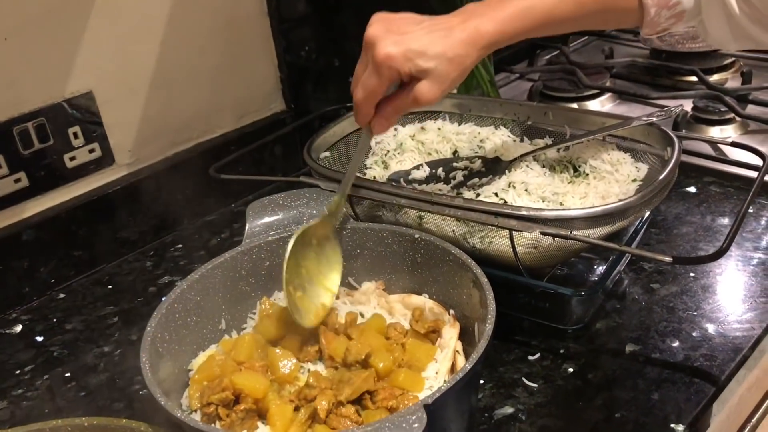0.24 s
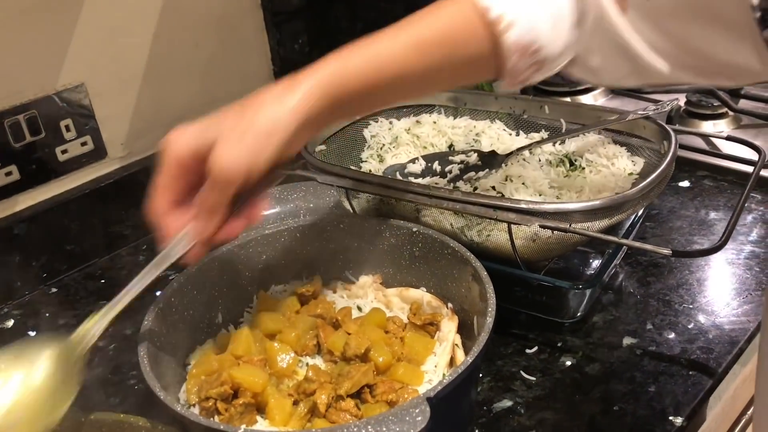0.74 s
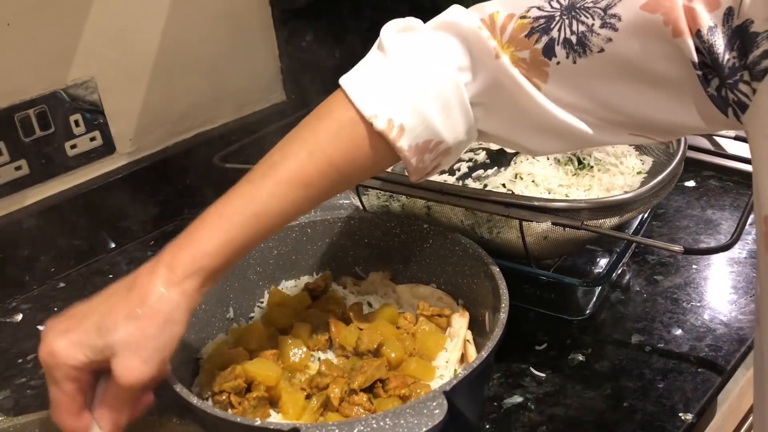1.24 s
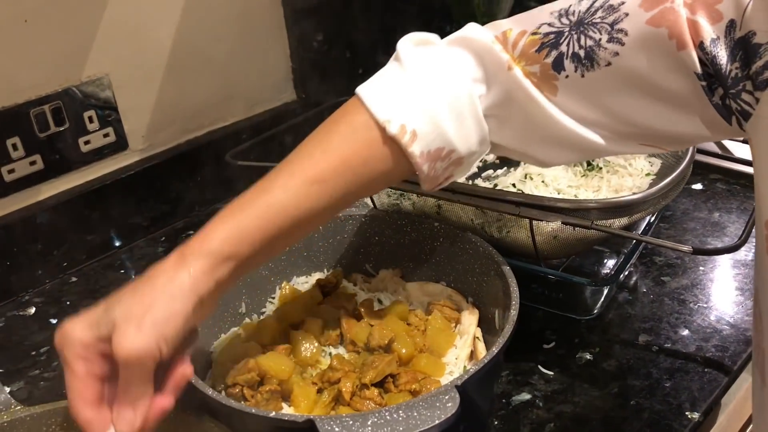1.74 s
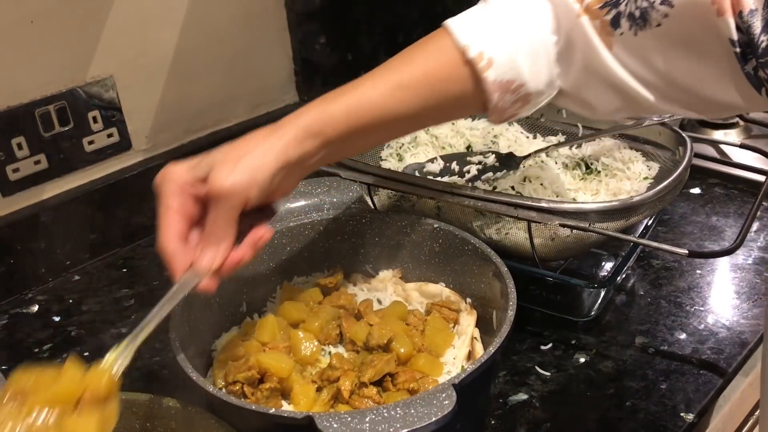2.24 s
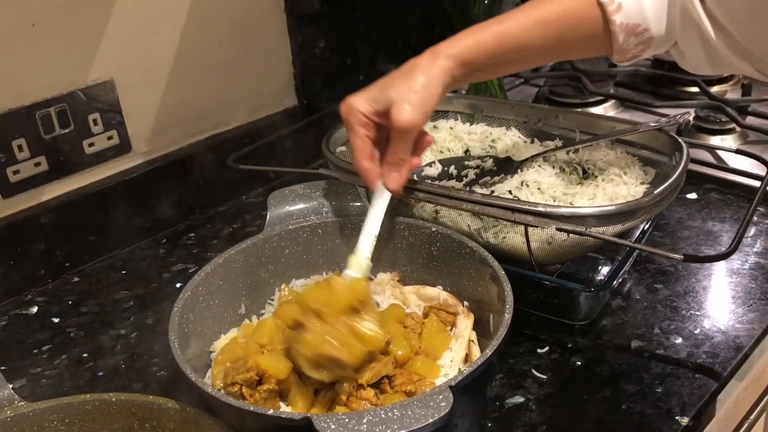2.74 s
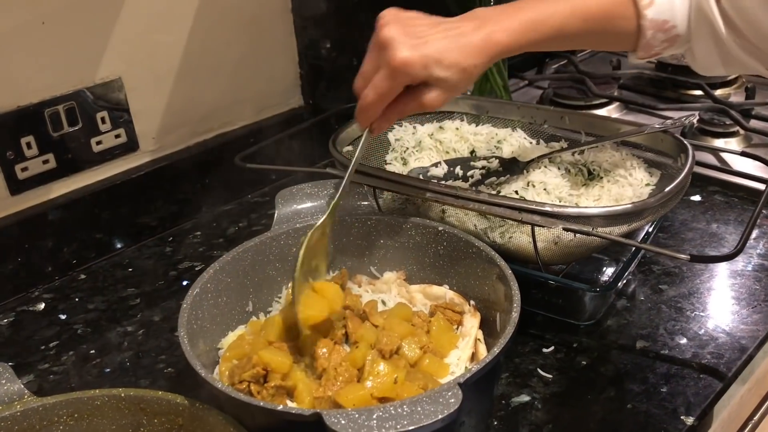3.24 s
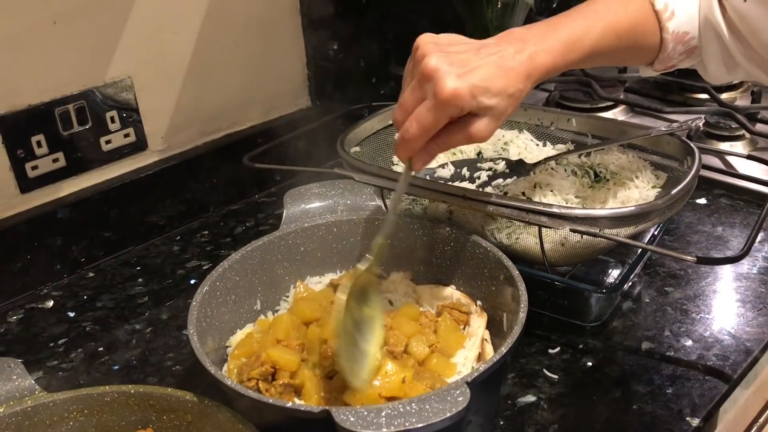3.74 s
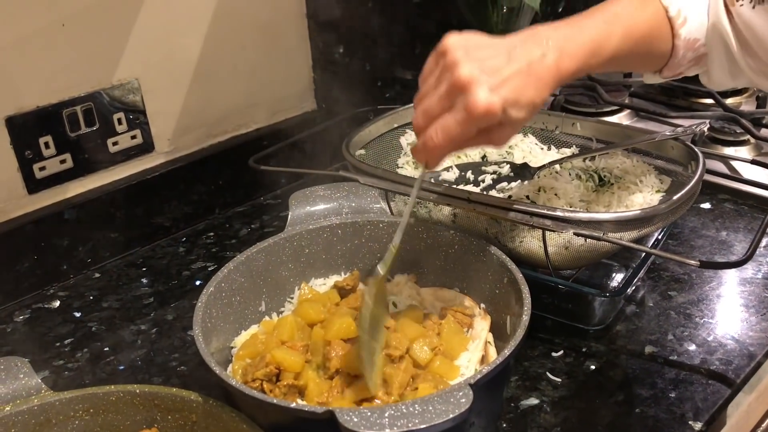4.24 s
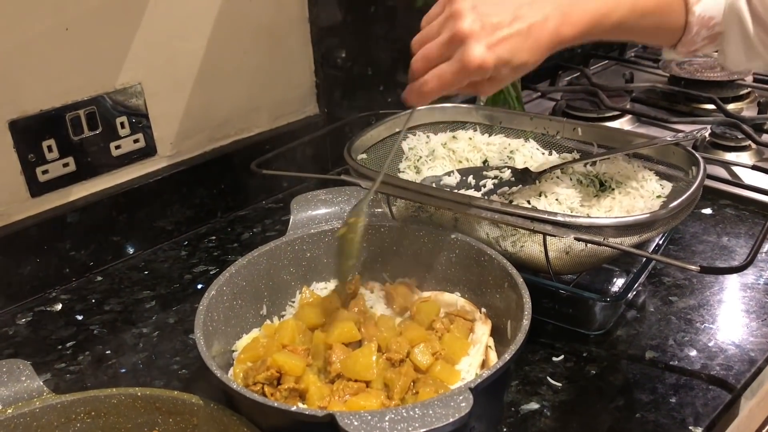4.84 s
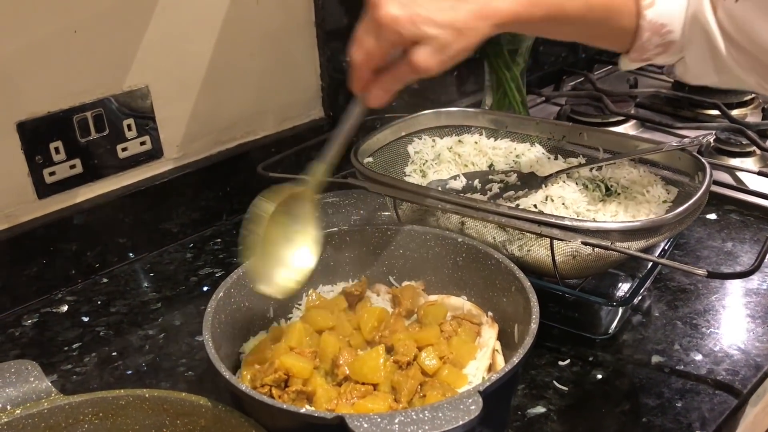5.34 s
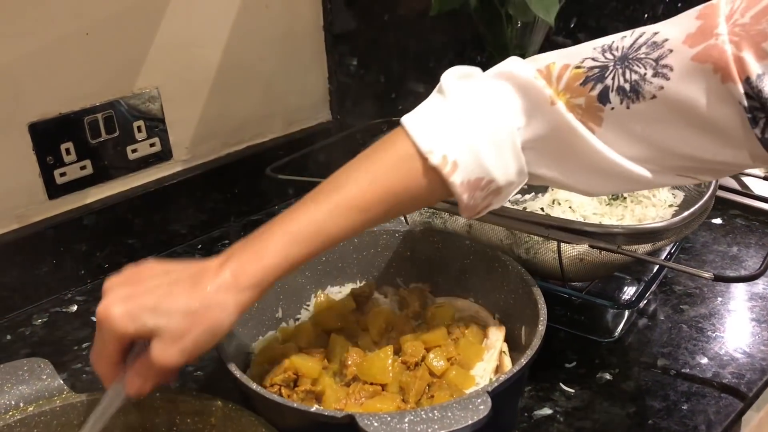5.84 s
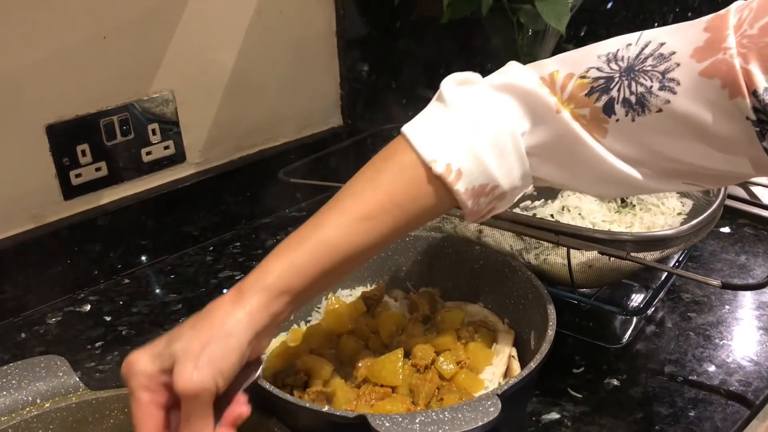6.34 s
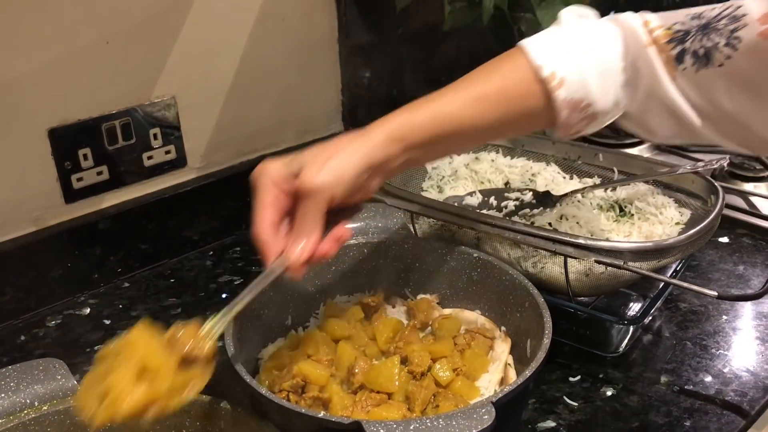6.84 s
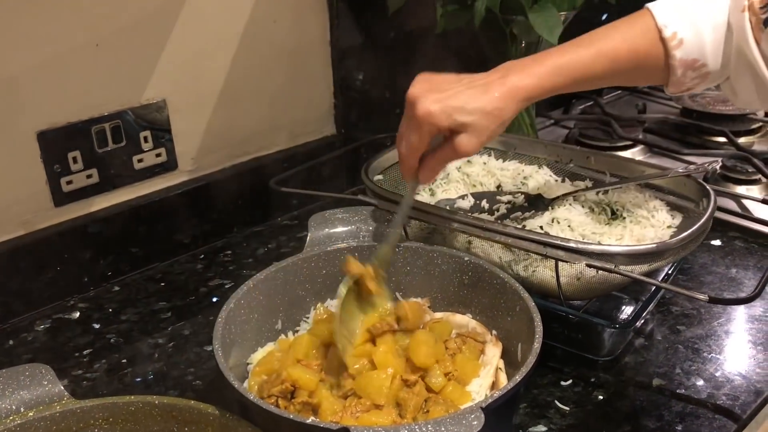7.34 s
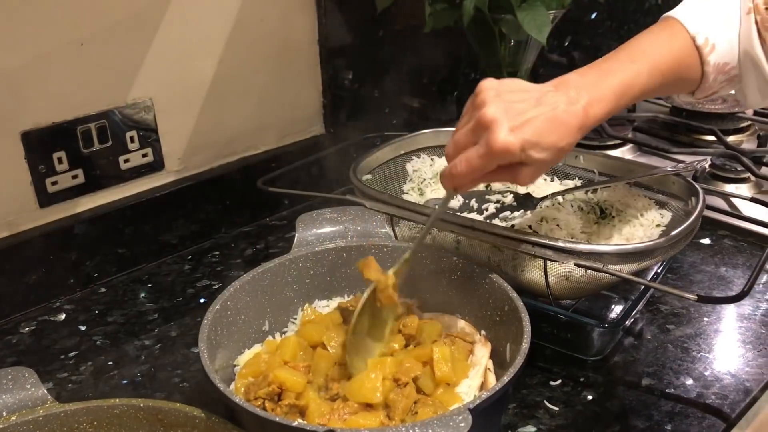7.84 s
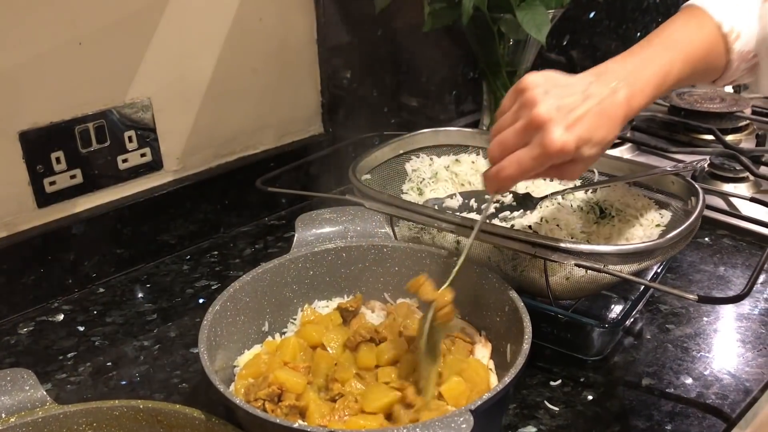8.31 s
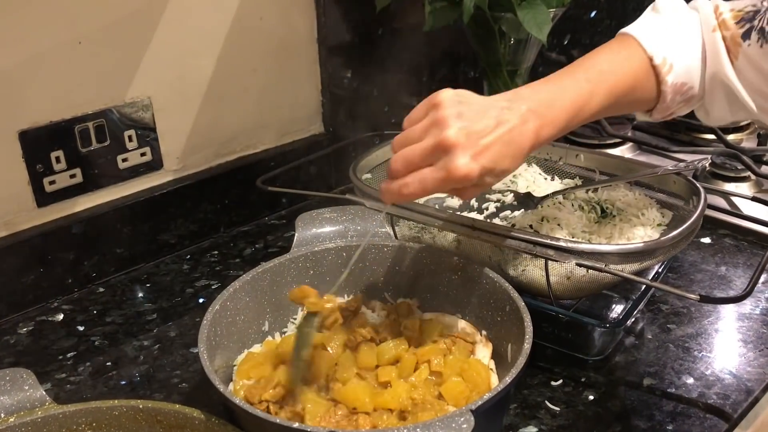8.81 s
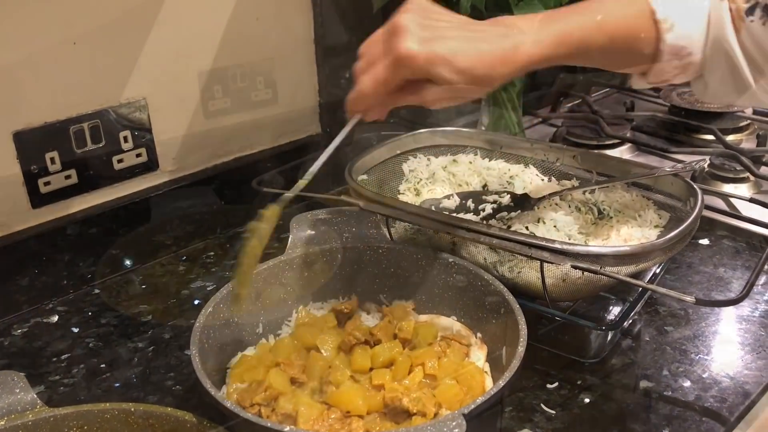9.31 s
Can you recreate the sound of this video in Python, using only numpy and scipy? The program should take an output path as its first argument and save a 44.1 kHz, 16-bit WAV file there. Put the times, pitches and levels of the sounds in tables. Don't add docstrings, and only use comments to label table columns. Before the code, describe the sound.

A quiet simmer of small chirping bubbles, thick glugs and fine spitting runs throughout. About one second in, a metal spoon strikes the pan rim with a bright, short clank and a gritty scrape. Near six seconds a duller knock on the pan bottom leads into another brief scrape. Close microphone in a hard-walled kitchen, with low rumble, hiss and mains hum.

```python
import sys
import numpy as np
from scipy import signal
from scipy.fft import rfft, irfft
from scipy.io import wavfile
from scipy.ndimage import uniform_filter1d

SR = 44100
rng = np.random.default_rng(int(sys.argv[2]) if len(sys.argv) > 2 else 0)


def amplitude_ratio(level_db):
    exponent = np.asarray(level_db, float) / 20
    return 10 ** exponent


def master(y):
    cut = np.clip(np.atleast_2d(y).T, -1, 1)
    pcm = np.round(cut * 32767)
    wavfile.write(sys.argv[1], SR, pcm.astype(np.int16))


N = 422037


def unit_rms(x):
    return x / np.sqrt(np.mean(x ** 2) + 1e-20)


def table_at(points, hz):
    f, value = np.transpose(points)
    return np.interp(np.log(hz + 1), np.log(f + 1), value)


def add(mix, start_s, sound):
    part = mix[round(start_s * SR):][:len(sound)]
    part += sound[:len(part)]


def coloured(x, db_of_hz):
    gain = amplitude_ratio(db_of_hz(np.fft.rfftfreq(len(x), 1 / SR)))
    return irfft(rfft(x) * gain, len(x))


def octaves_above_2k(hz):
    return np.log2((hz + 200) / 2000)


def resonance_db(hz, centre_hz, width_hz):
    return -20 * np.log10(1 + ((hz - centre_hz) / width_hz * 2) ** 2)


def swell_db(t):
    # centre in seconds, half width in seconds, rise in dB.
    swells = [
        (4.2, 0.34, 0),
        (4.9, 0.21, 6.5),
        (6.6, 0.43, 6.5),
        (7.6, 0.72, 4.5),
        (8.3, 0.26, 8.5),
        (9.6, 0.26, -9),
    ]
    return sum(db * np.exp(-((t - s) / half_width_s) ** 2) for s, half_width_s, db in swells)


def boil_db(t):
    # time in seconds, level in dB.
    vigour = [(0, 3), (.5, 2.5), (.95, -0.5), (1.65, 1.5), (2.05, -0.5), (2.9, 1.5), (3.1, -0.5), (4.1, 1),
              (4.85, 0), (5.2, 1.5), (6.3, 0.5), (7.3, 0), (8.2, 3), (8.65, -0.5), (9.25, 1.5),
              (9.57, -2.5)]
    return np.interp(t, *np.transpose(vigour))


def air():
    # frequency in Hz, level in dB.
    air_spectrum = [(15, -28.5), (25, -2), (48, 0), (107, -5), (157, -8), (206, -6), (450, -16),
                    (772, -16.5), (1010, -15.5), (2470, -14), (4980, -21.5), (6010, -22.5), (10300, -32.5),
                    (12800, -26), (15900, -31)]
    frames = N // 256 + 5
    hz = np.fft.rfftfreq(1024, 1 / SR)[:, None]
    t = np.arange(N) / SR
    real, imag, patches = rng.standard_normal((frames, 513, 3)).T
    patches = unit_rms(uniform_filter1d(uniform_filter1d(patches, 14, 0), 12, 1))
    flicker_db = unit_rms(uniform_filter1d(rng.standard_normal(frames), 5))
    patch_db = np.where(hz > 500, 2.8, 1.6) * patches
    z = (real + 1j * imag) * amplitude_ratio(table_at(air_spectrum, hz) + patch_db + flicker_db * (hz > 3000))
    rumble_db = swell_db(t)
    bands = [(-72, rumble_db, 0, 90), (-66.5, 0.088 * rumble_db, 90, 400), (-64.5, boil_db(t), 400, SR)]
    out = np.zeros(N)
    for db, change_db, low_hz, high_hz in bands:
        in_band = (hz >= low_hz) & (hz < high_hz)
        band = signal.istft(z * in_band, nperseg=1024, noverlap=768)[1][:N]
        out += unit_rms(band) * amplitude_ratio(db + change_db)
    return out


def hum():
    # frequency in Hz, level in dB.
    mains = [
        (100, -7),
        (200, 0),
        (300, -5),
        (400, -10),
        (500, -12),
    ]
    # frequency in Hz, width in Hz, level in dB.
    drone_modes = [
        (54.7, 20, -70),
        (115, 16, -69.5),
        (208, 38, -70),
    ]
    # start in seconds, length in seconds, rise in dB.
    motor_loads = [
        (2.15, 0.41, 7.4),
        (3.87, 0.425, 7.4),
    ]
    idle_db = -71
    t = np.arange(N) / SR
    waver = uniform_filter1d(rng.standard_normal((len(mains), N // 441 + 2)), 12, 1)
    lines = np.zeros(N)
    for (hz, db), w in zip(mains, waver):
        waver_db = 4.1 * np.interp(t, np.arange(len(w)) / 100, w)
        lines += amplitude_ratio(db + waver_db) * np.sin(2 * np.pi * hz * t)
    noise = rng.standard_normal(N)
    drones = np.zeros(N)
    for hz, width_hz, db in drone_modes:
        drone = unit_rms(coloured(noise, lambda f: resonance_db(f, hz, width_hz)))
        drones += amplitude_ratio(db + 45 / hz * swell_db(t)) * drone
    load_db = sum(db * np.clip(np.minimum(t - s, s + length_s - t) / 0.068, 0, 1)
                  for s, length_s, db in motor_loads)
    return amplitude_ratio(idle_db + load_db) * lines + drones


def pop(hz, cycles, rise):
    u = np.arange(round(4 * cycles / hz * SR)) / SR * hz / cycles
    tone = np.sin(2 * np.pi * cycles * (u + rise * u ** 2 / 2))
    return tone * (1 - np.exp(-u * 6)) * np.exp(-u * 1.32)


def spit(hz, narrow_db):
    t = np.arange(600) / SR
    hiss = coloured(rng.standard_normal(600), lambda f: -abs(narrow_db * np.log2((f + 50) / hz)))
    return unit_rms(hiss) * amplitude_ratio(-60 * t / 0.033) * np.minimum(t / 0.000098, 1)


def burst(db, hz, cycles, luck):
    climb_per_s = 0.22
    out = np.zeros(SR // 5)
    add(out, 0, amplitude_ratio(db - 8) * pop(hz, cycles, 0.029))
    add(out, 0, amplitude_ratio(db - 23) * spit(1.6 * hz, 32))
    for late, off in luck:
        wait_s = 0.006 + 0.1 * late ** 1.5
        follower_hz = hz * (0.92 + 0.17 * off + climb_per_s * wait_s)
        add(out, wait_s, amplitude_ratio(db - 13.5 - 45 * wait_s) * pop(follower_hz, 0.8 * cycles, 0.037))
    return out


def scatter(count, db, spread_db):
    when, size, share = rng.random((count, 3)).T
    s = when * N / SR
    size_db = spread_db * np.minimum(-np.log(1 - size), 2.5)
    return zip(s, db + 1.1 * boil_db(s) + size_db, share)


def simmer():
    # start in seconds, peak in dB, pitch in Hz.
    small_bubbles = [(0.08, -36.5, 2670), (0.466, -41, 2350), (1.606, -40, 2950), (1.649, -34.5, 3120),
                     (1.679, -41, 2328), (2.378, -44, 2030), (2.38, -43.5, 3200), (2.434, -37, 2324),
                     (2.63, -43, 3160), (2.832, -37.5, 3880), (2.934, -37, 2720), (3.358, -39.5, 2470),
                     (3.641, -42.5, 3500), (5.338, -37.5, 2300), (5.674, -38, 2400), (8.631, -45, 2870),
                     (3.131, -43, 3070), (6.467, -37.5, 3300), (6.79, -38, 3840), (8.733, -41, 3130),
                     (7.077, -40, 4300), (7.138, -38.5, 4400), (7.627, -42, 2450), (7.722, -36.5, 2650),
                     (8.005, -39, 2310), (8.242, -40, 3360), (8.13, -42.5, 4000), (8.805, -43, 3440),
                     (8.994, -41, 2460), (9.308, -41.5, 4280), (2.781, -42, 2650), (2.665, -43, 2450),
                     (2.985, -40, 2600), (6.873, -43, 3230), (7.478, -45, 3060), (6.52, -46, 1682),
                     (7.46, -45.5, 1948), (5.63, -40.5, 2340), (6.375, -43, 2310)]
    lower_bubbles = [(0.031, -41, 1470), (0.223, -40, 1486), (0.367, -35.5, 1590), (1.946, -42.5, 1800),
                     (2.82, -48, 1127), (3.262, -40, 1150), (3.695, -44.5, 1250), (3.757, -41, 1640),
                     (3.895, -38, 1880), (4.074, -47.5, 1015), (4.147, -38, 1780), (4.183, -34, 1744),
                     (4.25, -46, 1840), (4.418, -43.5, 1440), (4.445, -46, 1480), (4.481, -46.5, 1775),
                     (4.978, -39, 1940), (5.144, -42.5, 1860), (5.287, -41, 1870), (5.396, -42.5, 1460),
                     (5.611, -41.5, 1470), (6.163, -44, 1220), (7.537, -39.5, 1347), (8.296, -44, 1175),
                     (0.765, -51, 740), (2.16, -44, 2006), (3.442, -40.5, 1954), (3.528, -39.5, 2100),
                     (4.521, -43, 1993), (7.03, -44.5, 1260), (3.827, -44.5, 1470)]
    froth = [(0.068, -48, 4650), (0.118, -51.5, 3620), (0.222, -50, 1560), (0.241, -52.0, 2750),
             (0.373, -46, 2440), (0.518, -45.5, 1300), (0.895, -50, 1620), (1.68, -46, 2440),
             (1.784, -52.5, 2527), (1.986, -51.0, 2760), (2.035, -51, 3360), (2.056, -58.0, 4650),
             (2.872, -49, 2700), (2.963, -49.5, 4250), (3.096, -52.5, 1687), (3.383, -47.5, 2874),
             (3.511, -50.5, 4450), (3.647, -47, 2667), (4.103, -49.5, 4390), (4.182, -37.5, 1730),
             (4.421, -54, 2850), (4.521, -65, 1974), (4.746, -53.0, 2330), (4.852, -56, 4210),
             (4.871, -56, 2330), (5.152, -55.5, 1900), (5.214, -51, 1894), (5.291, -48.5, 3790),
             (5.338, -47.5, 2840), (5.695, -51, 2520), (6.225, -52, 2300), (6.226, -56, 3550),
             (6.389, -52, 3270), (6.403, -47.5, 2320), (6.522, -55, 4650), (6.93, -49, 3100),
             (7.075, -48, 4080), (7.23, -57, 1380), (7.349, -57, 2370), (7.371, -55.5, 1710),
             (7.636, -45, 2500), (8.295, -48, 1300), (8.629, -53.5, 2950), (8.803, -48, 3530),
             (8.877, -49, 2150), (9.079, -49.5, 2930), (9.08, -51, 4050), (9.363, -48.5, 2300)]
    for rows, cycles, lift_db in ((small_bubbles, 10.5, 0), (lower_bubbles, 9.5, 0), (froth, 11, 6)):
        if rows is small_bubbles:
            out = np.zeros(N)
        for (s, db, hz), luck in zip(rows, rng.random((len(rows), 5, 2))):
            add(out, s, burst(db + lift_db, hz, cycles, luck))
    for s, db, share in scatter(count=60, db=-51.5, spread_db=1.16):
        add(out, s, burst(db, 1700 * 3.2 ** share, 3.4, rng.random((3, 2))))
    for s, db, share in scatter(count=800, db=-60, spread_db=2.0):
        add(out, s, amplitude_ratio(db) * pop(1100 * 4.5 ** share, 2.7, 0.034))
    for s, db, share in scatter(count=1400, db=-71, spread_db=0.05):
        add(out, s, amplitude_ratio(db) * spit(5000 * 2.6 ** share, 30))
    return out


def spitting():
    # start in seconds, peak in dB, pitch
    # in Hz.
    spits = [(0.23, -45, 14400), (0.69, -56, 5780), (0.62, -43, 5530), (1.5114, -47, 13700),
             (1.5653, -44, 10300), (1.5875, -44, 6300), (1.6785, -40, 5500), (1.3, -47, 11000),
             (4.575, -44.5, 3900), (2.9955, -44.5, 5970), (3.005, -47, 3600), (2.7, -47, 4800),
             (3.2367, -45, 6760), (6.172, -46, 4000), (6.2265, -33, 2600), (4.947, -49.5, 5600),
             (5.002, -50, 8500), (5.1, -46, 13000), (5.158, -48, 5600), (4.0647, -42, 12700),
             (4.4625, -48, 8200), (4.9651, -48.5, 13000), (3.201, -46.5, 4400), (5.075, -45.5, 8000),
             (5.1232, -43.5, 6700), (5.4, -45.5, 5800), (6.138, -41, 9600), (6.2315, -43, 12200),
             (6.4121, -46, 10200), (6.4685, -45, 13500), (6.7312, -45.5, 7600), (7.2203, -47.5, 11800),
             (7.6333, -47.5, 12500), (7.7147, -46, 10800), (8.3308, -44, 6700), (9.099, -35.5, 7800),
             (9.0992, -44, 14000), (9.1, -46, 4400), (6.0273, -33, 9200), (6.028, -40, 2600),
             (1.318, -39, 9500), (1.301, -33, 8600), (1.302, -41, 12500), (1.37, -49, 11000),
             (1.054, -44, 11800), (4.9, -46, 2200),
             (0.846, -47, 14640), (1.68, -45.5, 14400), (1.754, -47, 8100), (1.853, -52, 14600),
                   (1.989, -47.0, 14640), (2.0, -47, 7340), (2.276, -49.5, 14990), (2.298, -49.5, 11100),
                   (2.705, -52, 13050), (3.116, -53.5, 14810), (3.392, -47.5, 8440), (3.596, -49.5, 8620),
                   (4.418, -49, 14640), (4.711, -50.5, 8270), (5.643, -60, 15330), (6.731, -57.5, 14900),
                   (6.874, -51, 9900), (7.222, -51.0, 15330), (7.314, -47, 13610), (7.399, -46.5, 8000),
                   (8.099, -50, 7800), (8.239, -50, 8900), (8.333, -52, 6200), (8.395, -55.5, 15300),
                   (9.307, -57, 15330), (9.461, -47.5, 5600)]
    out = np.zeros(N)
    for s, db, hz in spits:
        add(out, s, amplitude_ratio(db - 9.5) * spit(hz, -db - 25.5 + hz / 800))
    for s, db, share in scatter(count=30, db=-63.5, spread_db=2.5):
        add(out, s, amplitude_ratio(db) * spit(5500 * 2.6 ** share, 36))
    return out


def thud():
    # start in seconds, level in dB, pitch in Hz, t60 in seconds, smear in dB.
    thuds = [
        (0.522, -44.5, 248, 0.19, -5),
        (1.078, -31.5, 195, 0.053, -35.5),
        (5.88, -46, 560, 0.33, -30),
        (1.33, -56, 1152, 0.65, -1.5),
        (2.95, -65.5, 600, 0.11, -1),
        (5.255, -61, 770, 0.097, 0.5),
        (5.826, -44, 189, 0.088, -42),
        (8.04, -59, 840, 0.43, -8),
    ]
    width_share = 0.42
    t = np.arange(SR // 2) / SR
    out = np.zeros(N)
    noises = rng.standard_normal((len(thuds), len(t)))
    for (s, db, hz, t60_s, smear_db), noise in zip(thuds, noises):
        low = unit_rms(coloured(noise, lambda f: resonance_db(f, hz, width_share * hz)))
        smear = unit_rms(coloured(noise[::-1], lambda f: -4 * abs(octaves_above_2k(f) + 0.81)))
        envelope = amplitude_ratio(db - 60 * t / t60_s) * np.minimum(t / 0.0024, 1)
        add(out, s, envelope * (low + amplitude_ratio(smear_db) * smear))
    return out


def blow(modes, crack_colour, db, bright_db, crack_db, crack_t60_s):
    t = np.arange(SR // 4) / SR
    ring = np.zeros(len(t))
    for k, (hz, mode_db, t60_s) in enumerate(modes):
        level_db = mode_db + bright_db * octaves_above_2k(hz) - 60 * t / t60_s
        ring += (-1) ** k * amplitude_ratio(level_db) * np.sin(2 * np.pi * hz * t)
    crack = unit_rms(coloured(rng.standard_normal(len(t)), lambda hz: table_at(crack_colour, hz)
                              + bright_db * octaves_above_2k(hz)))
    both = (ring + amplitude_ratio(crack_db - 60 * t / crack_t60_s) * crack) * np.minimum(t / 0.00055, 1)
    no_bass = signal.butter(3, 500, "high", fs=SR, output="sos")
    return amplitude_ratio(db) * signal.sosfilt(no_bass, both)


def knocks():
    # start in seconds, strength in dB, brightness in dB per octave.
    rim_blows = [
        (1.0755, -1, 1.25),
        (1.0788, -5, 0.5),
        (1.0817, -3.5, 0.3),
        (1.0845, -10.5, -1),
    ]
    bottom_blows = [(1.054, -45, 1), (1.1861, -34, 6), (1.232, -29, 2), (1.301, -37, 7),
                    (5.8201, -9.5, -0.5), (5.8613, -30, 0), (5.8803, -25, 2), (5.901, -25, 5.5),
                    (5.9194, -25, -1), (5.935, -22, -1), (6.0282, -33, 0), (6.06, -33.5, -4)]
    # frequency in Hz, level in dB, t60 in seconds.
    rim_modes = [(760, -24.5, 0.12), (949, -20, 0.1), (1102, -7.5, 0.067), (1330, -12, 0.035),
                 (1490, -11.5, 0.082), (2040, -15.5, 0.12), (2570, -21, 0.086), (2730, -9.5, 0.037),
                 (2945, -6.5, 0.09), (3300, -22.5, 0.1), (3620, -25.5, 0.095), (3790, -18.5, 0.054),
                 (4340, -10.5, 0.04), (4750, -14, 0.054), (5518, -13.5, 0.05), (6070, -14, 0.055),
                 (6078, -12, 0.04), (6470, -18, 0.062), (6280, -12, 0.042), (7400, -25.5, 0.07),
                 (8300, -20, 0.067), (8200, -13, 0.028), (8740, -14.5, 0.035), (8740, -19.5, 0.049),
                 (8450, -24.5, 0.072), (9340, -27.5, 0.05), (10100, -30, 0.057), (9500, -38.5, 0.14),
                 (11600, -32, 0.069), (12130, -20.5, 0.024), (11940, -21, 0.024), (13800, -22, 0.016),
                 (13000, -18.5, 0.033), (14600, -21, 0.016), (15300, -18, 0.03), (15900, -24, 0.039)]
    bottom_modes = [(800, -13, 0.06), (600, -19, 0.04), (950, -10, 0.072), (1090, -9, 0.068),
                    (1470, -1, 0.1), (2650, -16.5, 0.18), (2770, -9, 0.025), (2950, -12, 0.07),
                    (3050, -17, 0.06), (3270, -14, 0.11), (3591, -13, 0.048), (4410, -6, 0.062),
                    (4580, -13, 0.05), (5380, -13.5, 0.061), (6040, -20, 0.056), (6390, -26, 0.071),
                    (7235, -40, 5.0), (7800, -29, 0.053), (7860, -27, 0.038), (9360, -26.5, 0.043),
                    (9846, -29, 0.037), (11100, -27, 0.067), (11870, -18, 0.03), (12840, -21.5, 0.02),
                    (13780, -45.5, 0.38), (15560, -27, 0.02), (11150, -20, 0.05)]
    more_rim_modes = [
        (11850, 0, 0.034),
        (759, 0, 0.15),
    ]
    # frequency in Hz, level in dB.
    rim_crack, bottom_crack = [
        [(71, -58), (120, -28.5), (384, -19.5), (1050, -1.5), (2140, -16.5), (2840, -3), (4020, -13), (5930, -3), (6980, -14.5), (8390, -9), (10700, -19.5), (11600, -10.5), (15800, -20.5)],
        [(180, -55), (300, -22.5), (950, -6), (1450, -10), (1890, -29), (2820, -4), (3860, -20), (4550, -7.5), (5030, -19), (5560, -17.5), (13600, -33.5), (15800, -30.5)],
    ]
    struck = rim_modes + [(hz, db - 11, t60_s) for hz, db, t60_s in more_rim_modes]
    rim = [(hz, db, 0.9 * min(t60_s, 0.12)) for hz, db, t60_s in struck]
    bottom = [(hz, db, 0.99 * min(t60_s, 0.09)) for hz, db, t60_s in bottom_modes]
    out = np.zeros(N)
    for s, db, bright_db in rim_blows:
        add(out, s, blow(rim, rim_crack, db - 6.5, bright_db, crack_db=0.88, crack_t60_s=0.018))
    for s, db, bright_db in bottom_blows:
        add(out, s, blow(bottom, bottom_crack, db - 12, bright_db, crack_db=1.7, crack_t60_s=0.058))
    return out


def clicks(db, spread_db, per_s):
    size_db = db + spread_db * np.minimum(rng.exponential(1, SR), 2.5)
    return amplitude_ratio(size_db) * (rng.random(SR) < per_s / SR)


def rubbing(peaks):
    # frequency in Hz, level in dB.
    grit = [(150, -55.5), (250, -26), (450, -13), (720, -7), (813, 4.5), (1350, -8.5), (1470, -2),
            (1700, -12.5), (2300, -8), (3430, -10.5), (5390, -14.5), (15800, -27)]
    skip_decay = amplitude_ratio(-60 * np.arange(2000) / SR / 0.054)
    judder = signal.oaconvolve(clicks(0, 2.2, 73), skip_decay)[:SR]
    slips = rng.standard_normal(SR) * clicks(0, 2.7, 4500) * (1 + 0.25 * judder)
    wander = uniform_filter1d(rng.standard_normal((len(peaks), 102)), 3, 1)
    rings = np.zeros(SR)
    for (hz, width_hz, db), w in zip(peaks, wander):
        wander_db = 6 * np.interp(np.arange(SR) / 441, np.arange(len(w)), w)
        b, a = signal.iirpeak(hz, hz / (width_hz + 5 + hz / 150), SR)
        ring = signal.lfilter(b, a, np.roll(slips, int(hz)))
        rings += amplitude_ratio(db + wander_db) * np.sqrt(width_hz) * unit_rms(ring)
    rough = unit_rms(coloured(slips, lambda hz: table_at(grit, hz)))
    rub = amplitude_ratio(-4) * rough + unit_rms(rings)
    low = signal.sosfiltfilt(signal.butter(4, 4000, fs=SR, output="sos"), rub)
    return unit_rms(low), unit_rms(rub - low)


def catch(db, hz):
    t60_1k_s, rise_s, trim_db = 0.062, 0.0021, -5
    t = np.arange(SR // 10) / SR
    pair = np.sin(2 * np.pi * hz * t) + 0.3 * np.sin(2 * np.pi * 1.03 * hz * t)
    decay_db = -60 * t / t60_1k_s * (hz / 1000) ** 0.31
    return amplitude_ratio(db + trim_db + decay_db) * (1 - np.exp(-t / rise_s)) * pair


def drags():
    # time in seconds, level in dB.
    pressures = [
        [(1.09, -32), (1.108, -34.5), (1.16, -33.5), (1.236, -36.5), (1.262, -43), (1.31, -39.5), (1.34, -48), (1.44, -58.5), (1.56, -67)],
        [ (5.836, -44), (5.87, -36), (5.905, -31), (5.938, -32), (5.952, -42), (6.03, -43.5), (6.07, -47), (6.118, -57.5), (6.2, -66)],
    ]
    # frequency in Hz, width in Hz, level in dB.
    damped_modes = [
        [(793, 70, -2), (947, 40, -4), (1100, 50, -3), (1460, 40, -3.5), (1800, 67, -11.5), (2100, 82, -4), (2420, 100, -4.5), (2880, 71, -6), (3840, 39, -7.5), (4650, 41, -7), (5073, 30, -9), (5560, 60, -9), (5930, 60, -9), (6260, 65, -10), (7140, 80, -14), (8400, 80, -13), (9900, 120, -17), (11800, 200, -20), (13700, 61, -26)],
        [(1260, 44, 2), (1440, 35, 4.5), (1007, 70, -5), (1950, 70, -6.5), (2200, 120, -1.5), (2450, 80, -5.5), (2670, 180, -9), (3740, 78, -7), (3820, 110, -10), (4390, 140, -17), (777, 39, -4), (5400, 110, -5), (5850, 54, -2), (6680, 79, -2.5), (8400, 130, -11), (9300, 150, -10), (11140, 150, -13), (11900, 150, -10), (14900, 300, -19)],
    ]
    # start in seconds, peak in dB, pitch in Hz.
    catches = [(1.126, -29.5, 6200), (1.127, -25, 4650), (1.131, -27.5, 5600), (1.143, -18, 1123),
               (1.149, -19.5, 2370), (1.16, -21.5, 820), (1.184, -22, 2050), (1.172, -25, 2950),
               (1.178, -28, 2350), (1.184, -20, 5230), (1.195, -31, 830), (1.218, -30, 4480),
               (1.225, -27, 870), (1.228, -36, 6540), (1.228, -22, 4150), (1.244, -26, 1460),
               (1.293, -26, 1460), (1.31, -28, 1460), (1.3, -29, 1103), (1.304, -37, 6276),
               (5.878, -36, 6890), (5.88, -20, 2830), (5.881, -19, 3620), (5.885, -29, 1460),
               (5.898, -18, 2260), (5.9, -38, 7490), (6.029, -35, 8400), (6.027, -30, 9300),
               (6.04, -38, 2200), (5.9, -33, 3270), (5.9, -18, 5400), (5.915, -24, 1460),
               (5.917, -26, 4390), (5.923, -23, 6350), (5.932, -32, 840), (5.934, -27, 3850),
               (6.024, -50, 7270), (6.058, -32, 3130), (5.956, -24.5, 1067), (5.99, -34, 800),
               (6.027, -33, 3200), (6.058, -38, 2150), (6.055, -30.5, 1460), (6.071, -39, 6300),
               (6.073, -35, 1380)]
    out = np.zeros(N)
    for rows, peaks, treble_db in zip(pressures, damped_modes, (-6, -8.5)):
        s, db = np.transpose(rows)
        t = np.arange(s[0], s[-1], 1 / SR)
        low, high = (part[:len(t)] for part in rubbing(peaks))
        pressure_db = np.interp(t, s, db)
        treble = amplitude_ratio(treble_db + 0.35 * (pressure_db + 34.5))
        sound = amplitude_ratio(pressure_db) * (low + treble * high)
        add(out, s[0], sound * signal.windows.tukey(len(t), 0.05))
    for s, db, hz in catches:
        add(out, s, catch(db, hz))
    return out


def kitchen(x):
    # frequency in Hz, t60 in seconds.
    band_t60 = [(150, 0.13), (500, 0.57), (1500, 0.25), (4000, 0.47), (12000, 0.2)]
    taps = np.zeros(SR // 2)
    at = np.arange(200, SR // 2 - 20, 20)
    taps[at + rng.integers(0, 20, len(at))] = rng.choice([-1., 1.], len(at))
    hz, t, z = signal.stft(taps, SR, nperseg=256)
    decay = amplitude_ratio(-60 * t / table_at(band_t60, hz)[:, None])
    tail = signal.istft(z * decay, SR, nperseg=256)[1]
    return signal.oaconvolve(x, tail / np.linalg.norm(tail))[:N]


def scene():
    room = air() + hum()
    stew, drops, far = simmer(), spitting(), thud()
    spoon = knocks() + drags()
    wet = kitchen(amplitude_ratio(-12.5) * spoon + amplitude_ratio(-3) * stew + amplitude_ratio(-6.5) * drops + amplitude_ratio(-1) * far)
    return (spoon + stew + drops + far + wet + room)[None]


def band_limit(x):
    return signal.sosfilt(signal.butter(12, 16570, fs=SR, output="sos"), x)


def record(dry):
    thin = signal.sosfilt(signal.butter(4, 36, "high", fs=SR, output="sos"), dry)
    rounded = np.tanh(thin * 1.2) / 1.2
    low_pass = signal.firwin(511, 15800, window=("kaiser", 8), fs=SR)
    mix = signal.oaconvolve(rounded, low_pass[None], "same")
    return band_limit(mix)


dry = scene()
out = record(dry)
master(out)
```